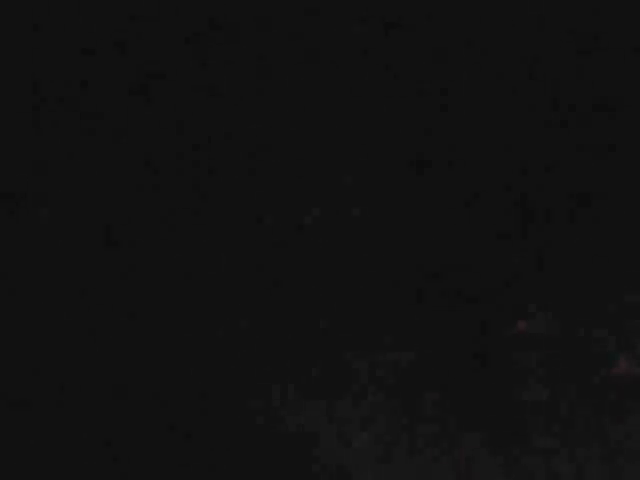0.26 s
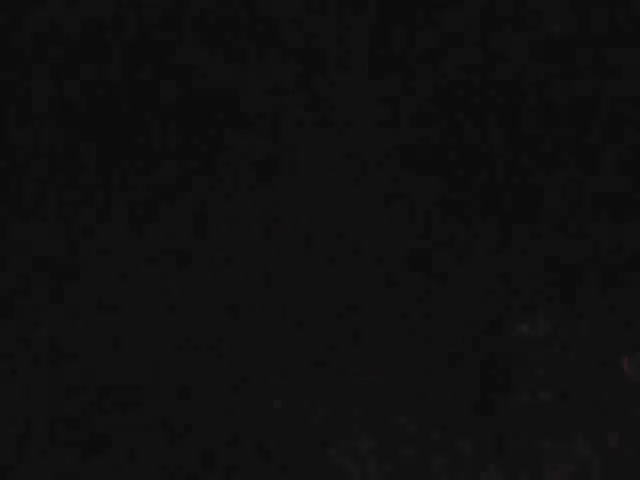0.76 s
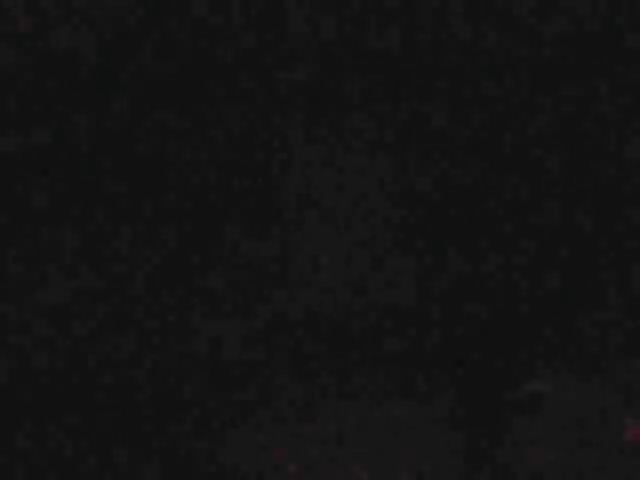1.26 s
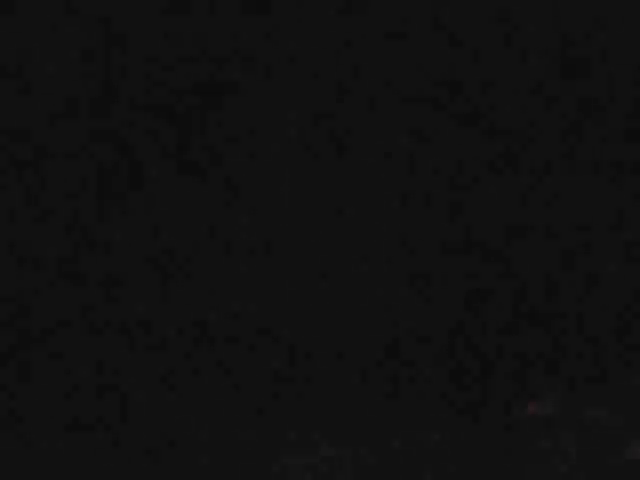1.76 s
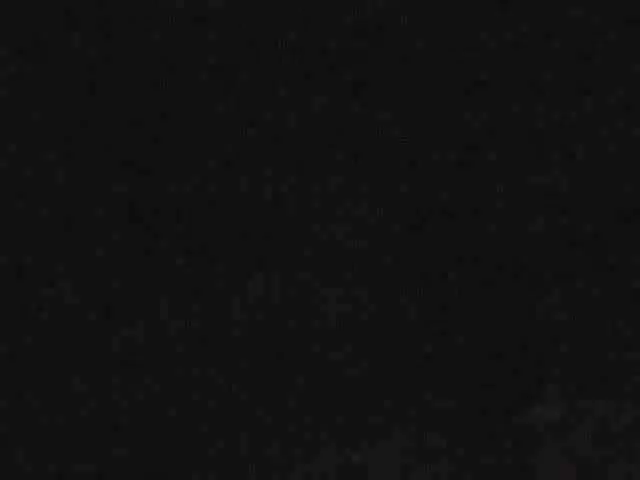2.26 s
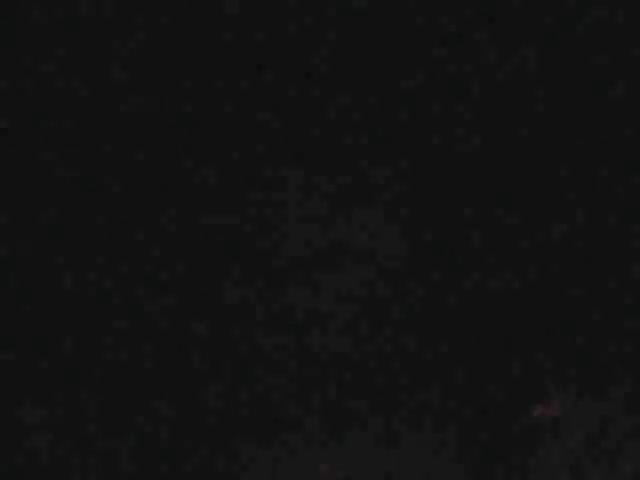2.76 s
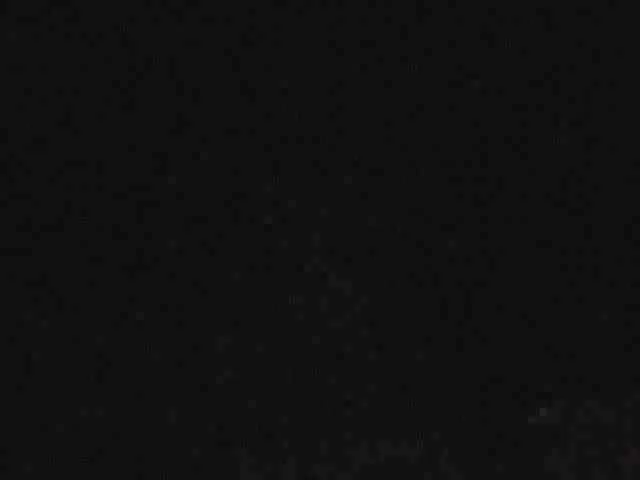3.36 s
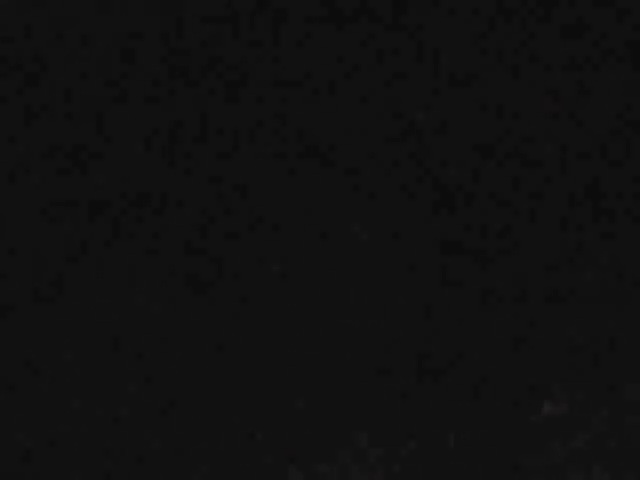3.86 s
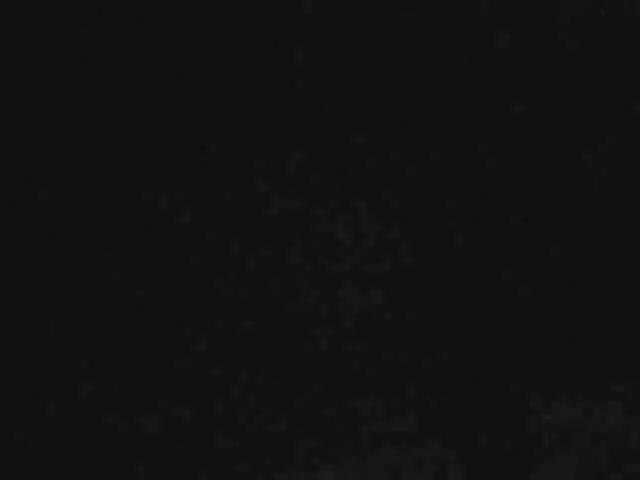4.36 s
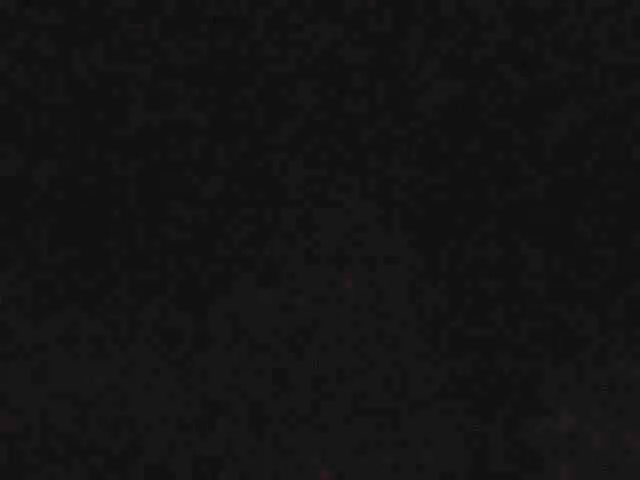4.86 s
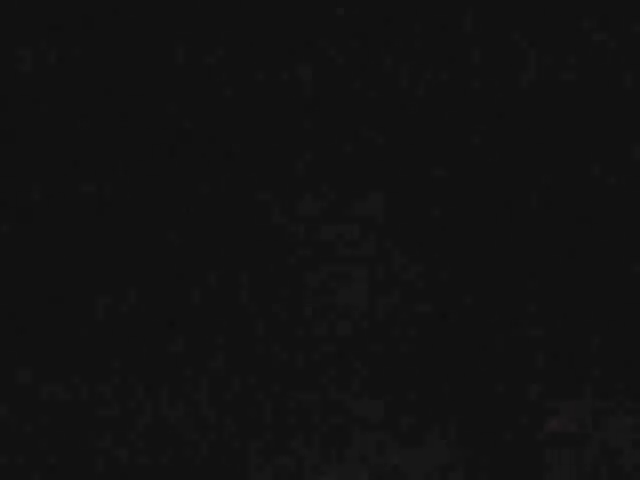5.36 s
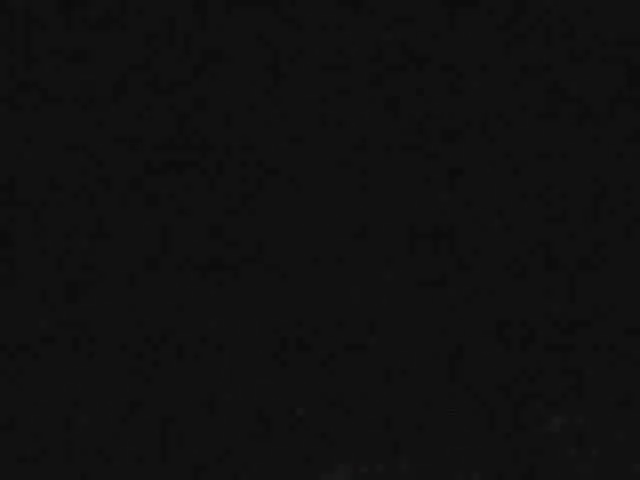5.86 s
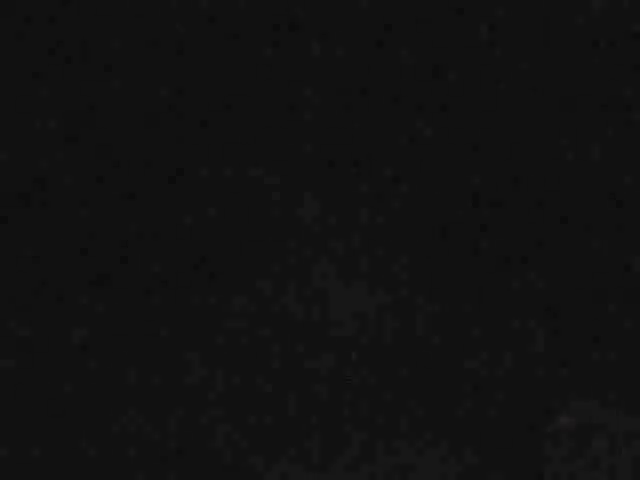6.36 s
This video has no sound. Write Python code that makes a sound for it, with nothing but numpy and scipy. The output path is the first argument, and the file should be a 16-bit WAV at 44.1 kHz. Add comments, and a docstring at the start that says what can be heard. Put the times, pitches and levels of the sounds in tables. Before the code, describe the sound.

In a quiet back yard at night, the fading ring of an earlier scream and a tiny twig tick precede a long, raspy fox scream that drops in pitch. Shorter barked screams follow, with high squeaks at their edges. A second fox whines thinly from farther away between them. The last scream is long, loud and cracked. Walls return blurred echoes over a low distant rumble; the microphone sound is dull on top.

```python
"""A fox screams again and again in a quiet back yard at night; another whines back from farther off.
Each scream is a period-doubled, partly chaotic tone that holds and then falls as the mouth closes;
squeaks and whines are short swelling harmonic notes. House walls return delayed, blurred noise echoes.
A twig ticks as a decaying sine, an earlier scream lingers as narrow noise bands, and shaped noise
makes a low distant rumble. The microphone channel cuts the top."""
import sys
import numpy as np
from scipy import signal
from scipy.fft import rfft, irfft
from scipy.io import wavfile

SR = 44100
rng = np.random.default_rng(int(sys.argv[2]) if len(sys.argv) > 2 else 0)


def output_pcm(signal):
    """Save a mono or channel-first signal as 16-bit PCM at the path in sys.argv[1].

    Samples are clipped to [-1, 1] before scaling.
    """
    pcm = np.clip(np.atleast_2d(signal).T, -1, 1) * 32767
    wavfile.write(sys.argv[1], SR, np.round(pcm).astype(np.int16))


N = 291942
TIME = np.arange(N) / SR

# night air, spectrum shape: (frequency [Hz], relative level per Hz [dB])
NIGHT_SPECTRUM = [(21, -16.5), (35, -10), (60, -0.5), (80, -5.5), (115, -5), (165, -12), (193, -10.5),
                  (281, -10), (512, -21), (763, -17.5), (891, -19), (995, -15), (1300, -24), (4700, -34.5),
                  (5610, -42.5), (7000, -74.5), (9100, -100), (15400, -120)]
NIGHT_DB = -45
# an earlier scream still dying away in the yard:
# (frequency [Hz], bandwidth [Hz], level at time zero [dB])
LINGERING_TONES = [(1040, 34, -53), (1740, 62, -49), (2130, 29, -49.5), (2580, 1100, -44)]
LINGERING_T60_S = 1.0
# walls around the yard: (delay [s], level before dulling [dB], dull above [Hz])
WALL_ECHOES = [(0.012, -15, 6080), (.029, -13, 5880), (.088, -10.5, 4050), (.135, -15, 3520),
               (.2, -22.5, 3000), (.29, -19.5, 2500), (0.562, -11, 700)]
# sound scattered about the yard: (frequency [Hz], level [dB], time to fall 60 dB [s])
YARD_SCATTER = [(700, -0.5, 1.5), (1100, -10, 2.73), (2050, -6, 1.51), (2920, -3.5, 1.14),
                (4530, -3.5, 0.81), (7000, -9, 1.3)]
SMEAR_GROWTH = 0.026   # longer paths come back more blurred: smear per second of delay
# a twig snaps: (time [s], starting level [dB], frequency [Hz], bandwidth [Hz])
TWIG_SNAP = (.162, -26.5, 3200, 450)
# fixed shape of the throat: (frequency [Hz], relative gain [dB])
THROAT_SHAPE = [(450, -41), (800, -22.5), (1200, 2), (1650, -1.5), (2000, 3.5), (2350, 1.5), (2800, 4),
                (3200, -2), (3900, -4), (4550, -4), (5200, -13.5), (5900, -19), (6600, -27.5),
                (7200, -44.5)]
# whines of the far fox, before the trims in scene(): (start [s], end [s], first pitch [Hz],
# last pitch [Hz], level [dB], roughness [0-1], mouth resonance [Hz])
FAR_WHINES = [(2.97, 3.08, 1178, 1156, -33.5, 0.2, 3600), (2.99, 3.2, 1195, 1152, -37.5, .5, 2350),
              (3.28, 3.48, 1049, 969, -36, 0.27, 2715), (4.421, 4.571, 1142, 1119, -35, .45, 3393),
              (4.48, 4.661, 1122, 1132, -35, .3, 2242)]
# high squeaks around the starts of the near screams: (start [s], end [s], first pitch [Hz],
# last pitch [Hz], level [dB], roughness [0-1], mouth resonance [Hz])
NEAR_SQUEAKS = [(.36, .39, 1796, 1990, -42.5, 0.4, 3620), (1.335, 1.41, 1890, 1993, -30, 0.48, 3930),
                (1.796, 1.83, 1687, 1680, -41.5, .3, 3350), (1.965, 2.045, 1720, 1564, -31.5, 0.3, 3330),
                (2.672, 2.708, 1697, 1945, -35, 0.4, 3524), (4.055, 4.1, 1670, 1918, -42, 0.3, 3377),
                (5.255, 5.32, 1620, 1800, -43.5, .6, 3550), (5.285, 5.39, 1502, 1224, -37, .75, 2670)]
# near screams, before the onset, closing and break changes below: (start [s], end [s], pitch [Hz],
# final drop [Hz], drop time constant [s], first level [dB], last level [dB], roughness [0-1],
# mouth resonance [Hz], lowest tone re level [dB], treble re level [dB])
NEAR_SCREAMS = [(.38, 1.075, 579.8, 102, .13, -25, -19.5, 0.39, 2720, -13.5, -11),
                (1.362, 1.49, 535.5, 177, 0.071, -23.5, -30, .9, 2930, -11, -7),
                (1.818, 1.95, 590, 9.96, 0.054, -31, -30, 0.63, 3036, -25.5, -10.5),
                (1.965, 2.07, 580, 170, .037, -34.5, -29.5, 0.38, 3250, -8, -10.5),
                (2.698, 2.92, 553.3, 175, .06, -24.5, -27.5, 0.4, 2465, -10, -9),
                (4.087, 4.425, 531, 140, 0.044, -24, -27, 0.4, 2732, -9.5, -8.5),
                (5.385, 6.08, 583, 141, 0.065, -23, -18, 0.53, 2380, -13, -8)]
# longer screams break onto another harmonic: (start [s], end [s], mouth resonance [Hz],
# roughness [0-1], level change [dB], treble change [dB])
HARMONIC_BREAKS = [(0.503, 0.618, 2960, 0.33, 1, 2), (0.636, 0.759, 1685, 0.28, 0.5, 2),
                   (.78, 0.954, 1630, 0.61, -2, 1.5), (4.222, 4.375, 3670, 0.3, -1.5, 0),
                   (5.53, 5.61, 4650, 0.1, -0.5, 5.5), (5.597, 5.714, 2860, 0.6, 2, 0),
                   (5.913, 5.942, 2170, 0.1, 4, -6), (5.966, 6.045, 2580, 0.06, -2.5, -1)]
BREAK_S = 0.012   # time that a break takes

ATTACK_S, RELEASE_S = 0.017, 0.04
LEAD_IN_S, LEAD_IN_DB = 0.022, -13.5   # the folds catch faintly just before the full voice
SAG_HZ_PER_S = 60   # the pitch sinks slowly before the final drop
# each scream bursts out sharp, rough and bright, with little of its lowest tone, then settles
SETTLE_S, ONSET_SHARP_HZ, ONSET_ROUGH = 0.06, 10, 0.6
ONSET_TREBLE_DB, ONSET_LOW_DB = 4, -11
# as the mouth closes the voice gets weaker and rougher, and its lowest tone comes forward
CLOSING_DB, CLOSING_ROUGH, CLOSING_LOW_DB = -6, 0.27, 5.5
MOUTH_FOLLOWS = 0.5   # exponent: how far the mouth resonance follows the pitch's fall
CUTOFF_HZ = 7450   # the microphone channel is 60 dB down from here up


def from_db(db):
    """Decibels to gain."""
    return 10 ** (np.asarray(db) / 20)


def at_hz(points, hz, column=1):
    """Read a table along a log-frequency axis."""
    points = np.array(points)
    return np.interp(np.log(np.maximum(hz, 1)), np.log(points[:, 0]), points[:, column])


def lowpass(x, hz, order=2):
    """Butterworth low-pass."""
    return signal.sosfilt(signal.butter(order, hz, fs=SR, output="sos"), x)


def wobble(hz, order=2):
    """Random motion up to a given rate; spread 1."""
    settling = 8000   # samples dropped while the filter settles
    x = lowpass(rng.standard_normal(N + settling), hz, order=order)[-N:]
    return x / x.std()


def gate(start, end, attack_s, release_s):
    """Attack, hold and release, from 0 to 1; the release is centred on the end."""
    attack = np.clip((TIME - start) / attack_s, 0, 1)
    release = np.clip((end - TIME) / release_s + 0.5, 0, 1)
    return attack * release


def night():
    """Far rumble and faint hiss: steady noise shaped by the night spectrum."""
    spectrum = rfft(rng.standard_normal(N))
    shape = from_db(at_hz(NIGHT_SPECTRUM, np.fft.rfftfreq(N, 1 / SR)))
    x = irfft(spectrum * shape, N)
    return from_db(NIGHT_DB) * x / x.std()


def lingering():
    """The harmonics of an earlier scream, blurred by the yard into narrow noise bands and fading."""
    ring = np.zeros(N)
    for hz, width_hz, db in LINGERING_TONES:
        blurred = np.sqrt(2) * wobble(width_hz / 2) * np.cos(2 * np.pi * hz * TIME)
        ring += from_db(db) * blurred
    return ring * from_db(-60 * TIME / LINGERING_T60_S)


def yard(x, smear_s, build_s):
    """Slightly smeared wall echoes and a scattered tail whose treble dies sooner than its middle."""
    t = TIME[:2 * SR]
    response = np.zeros(2 * SR)
    edges = np.geomspace(400, 8000, 9)   # scattered sound, band by band
    for low_hz, high_hz in zip(edges, edges[1:]):
        hz = np.sqrt(low_hz * high_hz)
        t60_s = at_hz(YARD_SCATTER, hz, 2)
        decay = from_db(-60 * t / t60_s) * (1 - np.exp(-t / build_s))
        band = signal.butter(2, [low_hz, high_hz], "band", fs=SR, output="sos")
        noise = signal.sosfilt(band, rng.standard_normal(len(t)))
        response += from_db(at_hz(YARD_SCATTER, hz)) * noise * decay / np.linalg.norm(decay)
    for delay, db, dull_hz in WALL_ECHOES:
        blur = np.exp(-np.abs(t - delay) / (smear_s + SMEAR_GROWTH * delay))
        bounce = rng.standard_normal(len(t)) * (t >= delay) * blur
        response += from_db(db) * lowpass(bounce / np.linalg.norm(bounce), dull_hz)
    return signal.fftconvolve(x, response)[:N]


def twig():
    """One dry tick: a sine that rings for a millisecond or two."""
    s, db, hz, width_hz = TWIG_SNAP
    age = np.maximum(TIME - s, 0)
    return from_db(db) * np.exp(-np.pi * width_hz * age) * np.sin(2 * np.pi * hz * age)


def partials(pitch, rough, count, jitter, chaos_hz, spread, rasp_db, mouth_hz):
    """Harmonics of unsteady folds; chaos moves their power into sidebands, the high ones first."""
    unsteady = 1 + jitter * rough * wobble(140) + 0.002965 * wobble(25)
    phase = 2 * np.pi * np.cumsum(pitch * unsteady) / SR
    waves = []
    for k in range(1, count + 1):
        # the harmonic that sits on the mouth resonance is steadied by it
        steadied = 1 - 0.2 * np.exp(-((k * pitch - mouth_hz) / 250) ** 2)
        chaos = np.tanh(rough * spread * (1 - np.exp(-k * pitch / 2000))) * steadied
        in_phase = np.sqrt(1 - chaos ** 2) + chaos * wobble(chaos_hz, order=3) / np.sqrt(2)
        across = chaos * wobble(chaos_hz, order=3)
        # air torn by the pulses widens the sidebands into a rasp
        across = across + from_db(rasp_db) * chaos * wobble(740, order=3)
        waves.append(np.sqrt(2) * in_phase * np.cos(k * phase) + across * np.sin(k * phase))
    return np.array(waves), np.arange(1, count + 1)[:, None] * pitch


def throat(hz, mouth_hz, width_hz, mouth_db):
    """Gain of each harmonic: the fixed throat and one moving mouth resonance."""
    mouth = mouth_db * np.exp(-((hz - mouth_hz) / width_hz) ** 2)
    return from_db(at_hz(THROAT_SHAPE, hz) + mouth)


def unit_power(gains):
    """Scale a set of harmonic gains to a total power of 1."""
    return gains / np.sqrt(np.sum(gains ** 2, axis=0) + 1e-12)


def thin_cries(notes, mouth_db, spread):
    """Short swelling notes with no period doubling; the pitch bends late."""
    out = np.zeros(N)
    for start, end, first_hz, last_hz, db, rough, mouth_hz in notes:
        progress = np.clip((TIME - start) / (end - start), 0, 1)
        pitch = first_hz + (last_hz - first_hz) * progress ** 2
        waves, hz = partials(pitch, rough, count=4, jitter=0.016, chaos_hz=215, spread=spread,
                             rasp_db=-1, mouth_hz=mouth_hz)
        on = (TIME > start) & (TIME < end)
        gains = unit_power(throat(hz[:, on], mouth_hz, width_hz=950, mouth_db=mouth_db))
        swell = (4 * progress[on] * (1 - progress[on])) ** 0.43
        out[on] += from_db(db) * swell * np.sum(gains * waves[:, on], axis=0)
    return out


def larynx():
    """Voice controls: every scream bursts out, holds and drops, and the longer ones break."""
    controls = np.zeros((6, N))
    for k, row in enumerate(NEAR_SCREAMS):
        start, end, hz, drop_hz, drop_s, first_db, last_db, rough, mouth_hz, low_db, treble_db = row
        age = np.clip(TIME - start, 0, end - start + RELEASE_S / 2)
        onset = np.exp(-age / SETTLE_S)
        closing = np.exp((start + age - end) / drop_s)
        pitch = hz + ONSET_SHARP_HZ * onset - SAG_HZ_PER_S * age - drop_hz * closing
        db = first_db + (last_db - first_db) * age / (end - start) + CLOSING_DB * closing
        lead_in = from_db(LEAD_IN_DB) * gate(start - LEAD_IN_S, end, LEAD_IN_S / 2, RELEASE_S)
        full_voice = gate(start, end, ATTACK_S, RELEASE_S)
        scream = [from_db(db) * np.maximum(lead_in, full_voice),
                  pitch,
                  rough + ONSET_ROUGH * onset + CLOSING_ROUGH * closing,
                  mouth_hz * (pitch / hz) ** MOUTH_FOLLOWS,
                  low_db + ONSET_LOW_DB * onset + CLOSING_LOW_DB * closing,
                  treble_db + ONSET_TREBLE_DB * onset]
        # each scream takes over from its lead-in; the first also fills the time before it
        controls = np.where((TIME >= start - LEAD_IN_S) | (k == 0), scream, controls)
    gain, pitch, rough, mouth_hz, low_db, treble_db = controls
    for start, end, break_hz, break_rough, change_db, brighter_db in HARMONIC_BREAKS:
        share = gate(start - BREAK_S / 2, end, BREAK_S, BREAK_S)
        mouth_hz = mouth_hz + share * (break_hz - mouth_hz)
        rough = rough + share * (break_rough - rough)
        gain = gain * from_db(share * change_db)
        treble_db = treble_db + share * brighter_db
    return gain, pitch, np.clip(rough, 0, 1), mouth_hz, low_db, treble_db


def screams():
    """The near fox: pressure sets the level, and the folds rattle as they turn rough."""
    gain, pitch, rough, mouth_hz, low_db, treble_db = larynx()
    waves, hz = partials(pitch, rough, count=13, jitter=0.012, chaos_hz=220, spread=2.3,
                         rasp_db=-8, mouth_hz=mouth_hz)
    uneven = from_db(2.0 * np.array([wobble(9) for _ in hz]))
    gains = throat(hz, mouth_hz, width_hz=220, mouth_db=7.0) * uneven
    # share out the power between lowest tone, body and treble
    upper = np.clip((hz - 2950) / 400, 0, 1)
    low = from_db(low_db)
    treble = from_db(np.minimum(treble_db, -0.5))
    body = np.sqrt(np.maximum(1 - low ** 2 - treble ** 2, 0.05))
    gains = body * unit_power(gains * (1 - upper)) + treble * unit_power(gains * upper)
    # the second harmonic is the folds' own rate and stays the cleanest tone: made apart
    gains[1] = 0
    tone, _ = partials(2 * pitch, rough, count=1, jitter=0.0098, chaos_hz=165, spread=0.65,
                       rasp_db=-23.5, mouth_hz=mouth_hz)
    rattle = from_db(1.0 * rough * wobble(110) + 0.74 * wobble(11))
    return gain * rattle * (np.sum(gains * waves, axis=0) + low * tone[0])


def scene():
    """Both foxes in the yard, with its echoes, the twig and the night behind them."""
    near = screams() + thin_cries(NEAR_SQUEAKS, mouth_db=12, spread=1.7)
    far = thin_cries(FAR_WHINES, mouth_db=23.5, spread=5.1)
    echoes = yard(near + from_db(-2.0) * far, smear_s=0.00099, build_s=0.012)
    foxes = near + from_db(-0.5) * far
    return (foxes + echoes + lingering() + twig() + night())[None]


def record(dry):
    """A narrow-band microphone channel cuts the top."""
    return signal.sosfilt(signal.cheby2(16, 60, CUTOFF_HZ, fs=SR, output="sos"), dry)


dry = scene()
out = record(dry)
output_pcm(out)
```